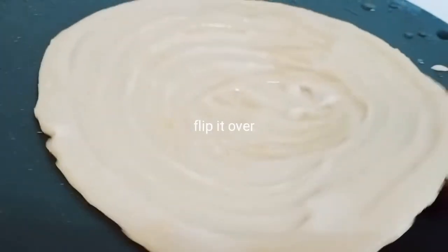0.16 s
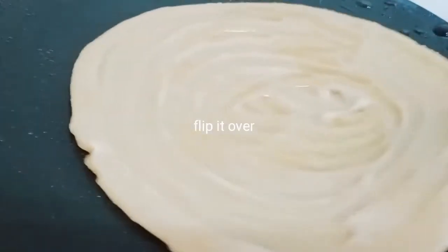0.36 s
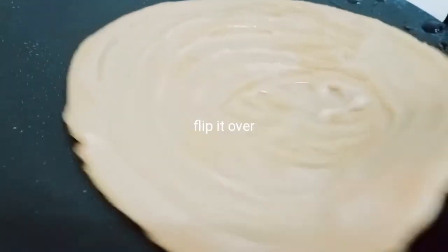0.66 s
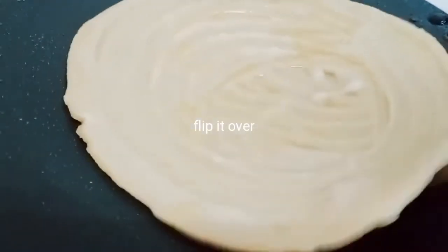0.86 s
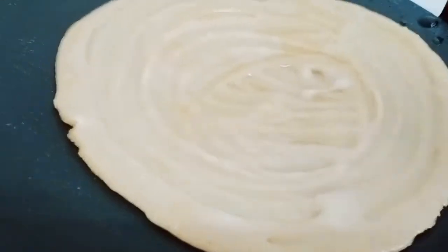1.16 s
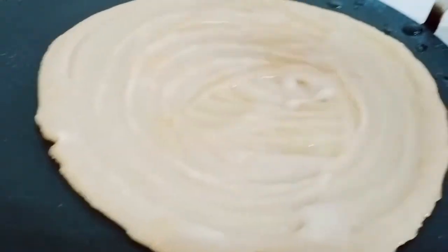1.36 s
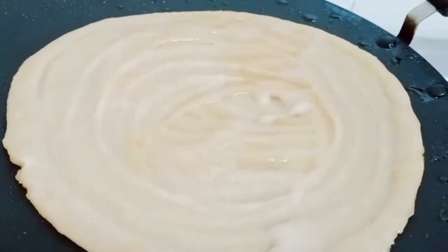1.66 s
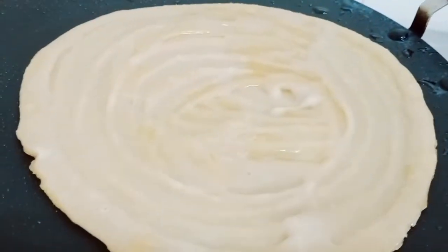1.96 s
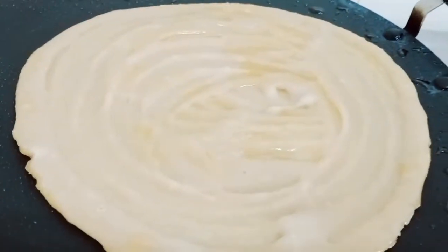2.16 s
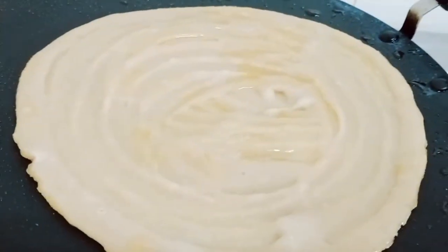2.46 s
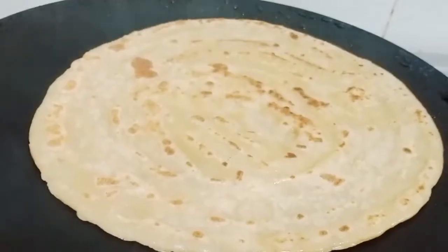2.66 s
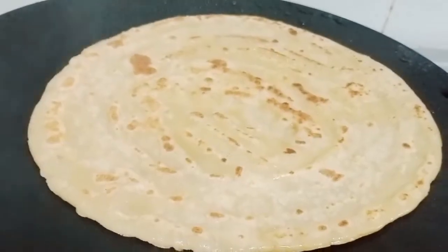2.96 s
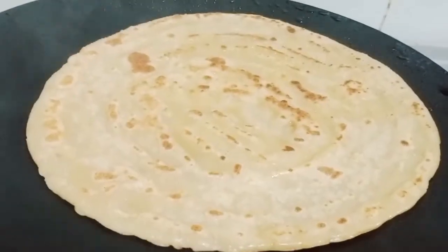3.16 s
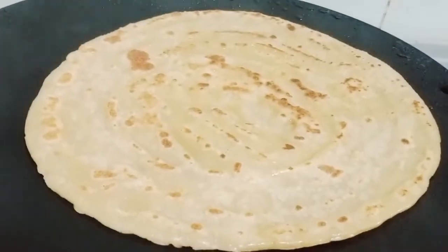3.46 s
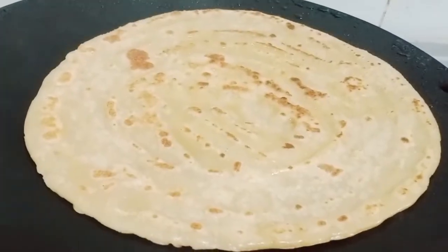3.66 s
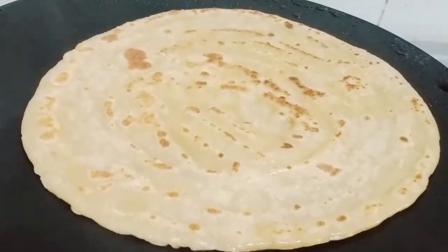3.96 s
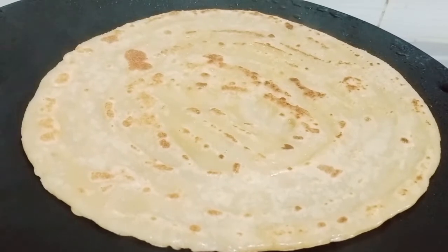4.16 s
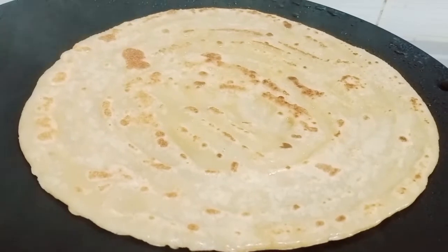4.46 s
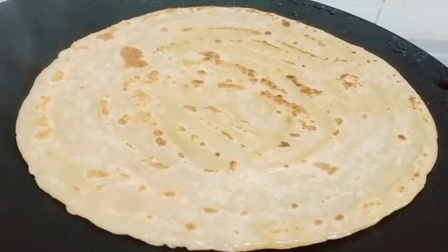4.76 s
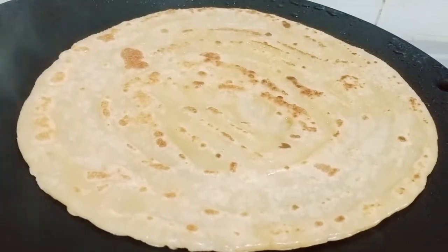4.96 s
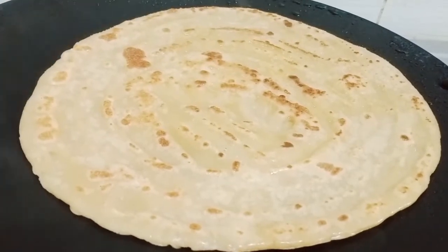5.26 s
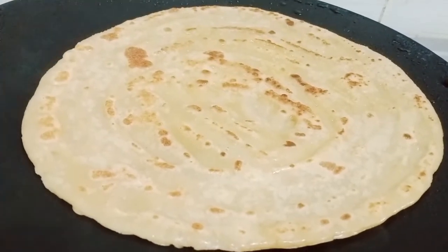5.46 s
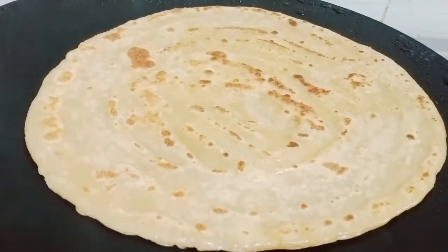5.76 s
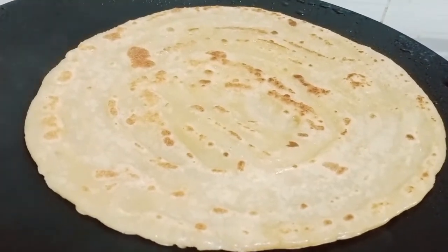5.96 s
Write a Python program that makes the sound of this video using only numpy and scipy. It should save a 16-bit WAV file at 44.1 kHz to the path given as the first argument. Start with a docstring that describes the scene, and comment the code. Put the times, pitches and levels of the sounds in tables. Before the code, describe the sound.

Close frying surges with sharp pops and ringing griddle clacks, fades, then switches to a smooth steady hiss and a thin, wavering high whistle.

```python
"""A flatbread fries in ghee on an iron griddle, close to a mono microphone in a small kitchen with an appliance hum.
First the fat sputters, fizzes and crackles in surges (random grains through colour filters), droplets pop
(resonated pulses) and a utensil knocks the griddle (clacks plus ringing modes); from about 1.9 s the frying sinks.
From three seconds on the browned bread hisses evenly (coloured noise with fine ticks), a few droplets still pop,
and steam whistles faintly from under it (a fluttering sine whose pitch sags and snaps back)."""
import sys
import numpy as np
from scipy import signal
from scipy.fft import rfft, irfft
from scipy.io import wavfile
from scipy.ndimage import uniform_filter1d

SR = 44100
rng = np.random.default_rng(int(sys.argv[2]) if len(sys.argv) > 2 else 0)


def waveform_to_disk(signal):
    """Save audio, clipped to [-1, 1], as 16-bit WAV at the path in sys.argv[1]."""
    frames = np.transpose(np.atleast_2d(signal))
    scaled = np.clip(frames, -1, 1) * 32767
    samples = np.round(scaled).astype(np.int16)
    wavfile.write(sys.argv[1], SR, samples)


N = 269847
T = np.arange(N) / SR
STEAM_START_S = 3.006  # frying stops, even hiss and whistle begin

# spectrum of crackle and fat ticks: (frequency [Hz], level [dB])
CRACKLE_SPECTRUM = [(300, -39), (1500, -26.5), (3500, -2.5), (5200, -6), (7200, -1), (9000, 1),
                    (12000, -4.5), (15500, 2)]


def amp(db):
    """Decibels to gain."""
    return 10 ** (np.asarray(db) / 20)


def unit(x):
    """Scale to rms 1."""
    return x / np.sqrt(np.mean(x ** 2))


def curves(table):
    """Each column of a table, interpolated over its time column to a value per sample."""
    s, *columns = np.transpose(table)
    return [np.interp(T, s, column) for column in columns]


def walk(rate):
    """Smooth random curve, rms 1, with about `rate` turns a second."""
    hold = max(int(SR / rate), 2)
    steps = np.repeat(rng.standard_normal(N // hold + 1), hold)
    return unit(uniform_filter1d(steps, hold)[:N])


def resonate(x, hz, width_hz):
    """One resonance with gain 1 at its centre."""
    b, a = signal.iirpeak(hz, hz / width_hz, fs=SR)
    return signal.lfilter(b, a, x)


def colour(x, points, size=4096):
    """Minimum-phase filter through (Hz, dB) points, so clicks keep their sharp front."""
    hz, db = np.transpose(points)
    bins_hz = np.arange(size // 2 + 1) * SR / size
    gain_db = np.interp(np.log(bins_hz + 1), np.log(hz), db)
    # fold the cepstrum to make the filter causal
    cepstrum = irfft(np.log(amp(gain_db)))
    cepstrum[1:size // 2] *= 2
    cepstrum[size // 2 + 1:] = 0
    impulse = irfft(np.exp(rfft(cepstrum)))
    return signal.fftconvolve(x, impulse)[:N]


def fade(t, t60):
    """Exponential decay, 60 dB down after t60 seconds."""
    return np.exp(-np.log(1000) * t / t60)


def add(track, s, sound):
    """Mix a short sound into a track at time s."""
    i = int(s * SR)
    track[i:i + len(sound)] += sound[:N - i]


def bursts(per_second, spread_db, cap_db):
    """Tiny bubbles bursting at random: many small, a few large, rms 1."""
    happens = rng.random(N) < per_second / SR
    size_db = cap_db * np.tanh(spread_db * rng.exponential(size=N) / cap_db)
    return unit(happens * amp(size_db) * rng.choice([-1, 1], N))


def kitchen():
    """A motor hums with slightly unsteady tones over the low rush of the room."""
    # hum tones: (frequency [Hz], rms level [dB])
    hum_tones = [(118.4, -73.5), (177.6, -70.5), (196.3, -62), (294.3, -62.5), (314.4, -61), (2530, -71.5)]
    # room rush spectrum: (frequency [Hz], level [dB])
    rush_spectrum = [(25, -37), (36, -23), (49, 8.5), (62, -5.5), (100, 1.5), (175, 4), (250, -1.5),
                     (335, 1), (410, -4.5), (750, -6.5), (1150, -8.5), (1600, -6), (5000, -22),
                     (15000, -16)]
    hum = np.zeros(N)
    for hz, db in hum_tones:
        tone = np.sin(2 * np.pi * hz * T + 0.46 * walk(6.5))
        hum += amp(db) * unit(tone * amp(1.5 * walk(9.9)))
    rush = unit(colour(rng.standard_normal(N), rush_spectrum))
    return hum + amp(-54) * rush


def walls(x, t60, wet_db):
    """Short diffuse echo of the tiled kitchen: decaying noise after a 4 ms gap."""
    t = T[:SR // 2]
    tail = rng.standard_normal(len(t)) * fade(t, t60) * (t > .004)
    echo = signal.fftconvolve(x, tail / np.linalg.norm(tail))[:N]
    return x + amp(wet_db) * echo


def whistle():
    """A narrow steam jet sings and flutters; pitch sags as the soft opening yields, then snaps back up."""
    # jet: (time [s], mean pitch before flutter [Hz], level [dB])
    jet = [(3.01, 5750, -65), (3.38, 5360, -61), (3.52, 5820, -69), (3.61, 6090, -61), (3.76, 6000, -65),
           (3.95, 6320, -61), (4.17, 5820, -64), (4.35, 6200, -62), (4.45, 5520, -66), (4.55, 5330, -60),
           (4.7, 5550, -64.5), (5.1, 5580, -63), (5.27, 5790, -65), (5.44, 5570, -59.5), (5.68, 5290, -64),
           (5.88, 5600, -69), (5.97, 5980, -60), (6.11, 5670, -63)]
    snaps_per_s, sag_hz_per_s, sag_limit_hz = 12, 1700, 170.2
    hz, db = curves(jet)
    last_snap_s = np.maximum.accumulate(T * (rng.random(N) < snaps_per_s / SR))
    sag_hz = np.minimum(sag_hz_per_s * (T - last_snap_s), sag_limit_hz)
    flutter = 1 + .005 * walk(60) + .009 * walk(900)
    pitch_hz = (hz + sag_hz.mean() - sag_hz) * flutter
    tone = np.sin(2 * np.pi * np.cumsum(pitch_hz) / SR)
    waver = amp(2.2 * walk(90) + 1.5 * walk(14))
    return unit(tone * waver) * amp(db) * (T >= STEAM_START_S)


def steam():
    """Steam seeps from under the browned bread: a smooth hiss with fine ticks of fat."""
    # hiss spectrum: (frequency [Hz], level [dB])
    hiss_spectrum = [(300, -6.5), (1100, -21), (2100, -2), (2600, 3), (3450, 7), (4100, -2), (4850, -13.5),
                     (5600, -6), (6800, -10), (8200, -3), (9500, -4.5), (11500, -5), (13800, 5),
                     (15500, 2.5)]
    hiss_db, ticks_db = -47, -58.5
    hiss = unit(colour(rng.standard_normal(N), hiss_spectrum)) * amp(0.39 * walk(18))
    ticks = unit(colour(bursts(per_second=910, spread_db=4.5, cap_db=30), CRACKLE_SPECTRUM))
    return (hiss * amp(hiss_db) + ticks * amp(ticks_db)) * (T >= STEAM_START_S)


def iron_ring():
    """Griddle ring after one blow: decaying sine modes, neighbours swinging opposite ways."""
    # griddle modes: (frequency [Hz], level [dB], t60 [s])
    modes = [(184.7, 4.5, 0.11), (274.7, -1, 0.52), (323, 2.5, 0.24), (372.4, 3.5, 0.3), (417, -1.5, 0.22),
             (654, 3.5, 0.41), (718, 5.5, 0.17), (1204, 1, 0.16), (1520, -16, .25), (1590, -21, .22),
             (1820, -26, 0.21), (2240, 1, 0.27), (2380, -12, 0.2), (2560, -2, 0.11), (3160, -11, .2),
             (3520, -13, 0.29)]
    t = T[:SR // 2]
    ring = np.zeros(len(t))
    for k, (hz, db, t60) in enumerate(modes):
        ring += (-1) ** k * amp(db) * np.sin(2 * np.pi * hz * t) * fade(t, t60)
    return ring


def knocks():
    """Each knock of the utensil is one or more short clacks of different pitch over ringing iron."""
    # clacks: (time [s], clack peak [dB], clack pitch [Hz], ring over clack before a 28 dB cut [dB])
    clacks = [(0.498, -29.5, 1470, 2.5), (0.6915, -23, 755, 5), (0.692, -21, 2470, -19),
              (1.0901, -23.5, 407, -12), (1.093, -24.5, 1990, 6), (1.276, -13.5, 2640, -12),
              (1.28, -25, 2740, -21), (1.288, -29, 750, 10.5), (1.294, -25.5, 3560, -13),
              (1.303, -21.5, 3700, -24), (1.4352, -15, 3540, -23), (2.1, -36, 1085, 3)]
    out, t, ring = np.zeros(N), T[:SR // 2], iron_ring()
    grits = rng.standard_normal((len(clacks), len(t)))
    for (s, db, hz, ring_db), grit in zip(clacks, grits):
        push = grit * (0.14 * fade(t, t60=0.009) + 0.023 * fade(t, t60=0.2))
        push[0] = -1
        clack = resonate(resonate(push, hz, width_hz=1200), hz, width_hz=1700)
        clack = clack / np.abs(clack).max()
        add(out, s, amp(db) * (clack + amp(ring_db - 28) * ring))
    return out


def spits(crackle_db):
    """More droplets at random moments, stronger when the fat fries hard: rows as pops() takes them."""
    spits_per_s, over_crackle_db, spread_db, body_re_snap_db = 16, 19.5, 3.5, -9.5
    chance = rng.random((400, 3))[:int(spits_per_s * STEAM_START_S)]
    s = chance[:, 0] * STEAM_START_S
    size_db, body_db = spread_db * (2 * chance[:, 1:].T - 1)
    snap_db = np.interp(s, T, crackle_db) + over_crackle_db + size_db
    return list(zip(s, snap_db, body_re_snap_db + body_db))


def pops(droplets):
    """A droplet snaps with one sharp pulse, then spatters; its body is a dull thud and a short hollow ring."""
    snaps, bodies = np.zeros(N), np.zeros(N)
    t = T[:SR // 20]
    sprays = rng.standard_normal((500, len(t)))
    for (s, db, body_db), spray in zip(droplets, sprays):
        pulse = spray * (0.039 * fade(t, t60=0.0052) + 0.019 * fade(t, t60=0.082))
        pulse[0] = -1
        add(snaps, s, amp(db) * pulse)
        add(bodies, s, amp(db + body_db) * pulse)
    thud = amp(13) * resonate(bodies, hz=910, width_hz=4100)
    hollow = amp(11.5) * resonate(bodies, hz=3520, width_hz=370)
    return amp(4.0) * resonate(snaps, hz=11100, width_hz=8100) + thud + hollow


def frying_levels():
    """Levels of sputter, fizz and crackle [dB]: a simmer that sinks as the batter sets, reshaped by each surge."""
    # surges: (start [s], hold [s], crackle change [dB], fizz change [dB], sputter change [dB])
    surges = [(0.038, 0.051, 7.5, 5.5, 2), (0.175, 0.044, 10.5, 0, 2.5), (0.257, 0.06, 9, 5, -1.5),
              (0.363, 0.053, 5.5, 3, -2), (0.545, 0.045, 10, 7.5, 4), (0.753, 0.028, 4.5, 8.5, 7.5),
              (0.911, 0.069, 8, 6, 3.5), (1.161, 0.041, 6.5, 8, 3.5), (1.256, 0.062, 6, -2, -5.5),
              (1.378, 0.04, 6, 4, -5), (1.526, 0.21, 5.5, 4, 4)]
    attack_s, release_s, batter_sets_s = 0.029, 0.04, 1.885
    set_s = np.maximum(T - batter_sets_s, 0)
    # simmer level [dB], fall once set [dB/s]; the sputter also wanes 4 dB/s from the start
    sputter_db = -46 - 4 * T - 8.5 * set_s
    fizz_db = -46.5 - 10.5 * set_s
    crackle_db = -45.5 - 14.5 * set_s
    for s, hold_s, crackle_change, fizz_change, sputter_change in surges:
        attack = np.clip((T - s) / attack_s, 0, 1)
        surge = attack * np.exp(-np.maximum(T - s - attack_s - hold_s, 0) / release_s)
        sputter_db = sputter_db + sputter_change * surge
        fizz_db = fizz_db + fizz_change * surge
        crackle_db = crackle_db + crackle_change * surge
    return sputter_db, fizz_db, crackle_db


def sputter():
    """Coarse bubbling: the wet batter first gargles in a narrow band, which broadens as it sets."""
    # broad sputter spectrum: (frequency [Hz], level [dB])
    broad_spectrum = [(120, -8.5), (450, 0), (560, -2.5), (770, 5.5), (1050, -2.5), (1500, -1.5),
                      (2250, 0.5), (3200, -8.5), (8000, -28)]
    grains = bursts(per_second=2700, spread_db=3.5, cap_db=24)
    gargle = resonate(resonate(grains, hz=1540, width_hz=1600), hz=1530, width_hz=2200)
    wet = np.interp(T, [.35, 1.15], [.85, .08]).clip(0, 1)
    broad = colour(bursts(per_second=3000, spread_db=3.0, cap_db=25), broad_spectrum)
    return np.sqrt(wet) * unit(gargle) + np.sqrt(1 - wet) * unit(broad)


def brighten(x):
    """Smaller bubbles snap higher: the top rises steadily while the batter dries."""
    corner_hz, rise_db_per_s, neutral_s = 11000, 4.5, 1.2
    top = signal.sosfiltfilt(signal.butter(3, corner_hz, "high", fs=SR, output="sos"), x)
    top_db = rise_db_per_s * (np.minimum(T, STEAM_START_S) - neutral_s)
    return x + top * (amp(top_db) - 1)


def frying(sputter_db, fizz_db, crackle_db):
    """Water boils out through the fat: coarse sputter, plus dense wet fizz and sharper crackle in flurries."""
    # fizz spectrum: (frequency [Hz], level [dB])
    fizz_spectrum = [(300, -16), (1700, -15.5), (2350, 3), (2900, 3.5), (3550, 6.5), (4200, 4.5),
                     (5000, -3.5), (7000, -7.5), (11500, -3.5), (15500, -0.5)]
    # hard frying bursts more bubbles as well as louder ones
    busy = amp(.5 * np.maximum(crackle_db - crackle_db.max(), -23))
    flurries = amp(4 * np.tanh(walk(400))) / np.sqrt(busy)
    bubbles = bursts(per_second=6000 * busy, spread_db=2.5, cap_db=12)
    fizz = unit(colour(bubbles * flurries, fizz_spectrum))
    grains = bursts(per_second=3800 * busy, spread_db=6.5, cap_db=22)
    crackle = brighten(unit(colour(grains * flurries, CRACKLE_SPECTRUM)))
    sizzle = sputter() * amp(sputter_db) + fizz * amp(fizz_db) + crackle * amp(crackle_db)
    return sizzle * (T < STEAM_START_S)


def scene():
    """Everything on the griddle in its room, the same in both channels."""
    # droplets that stand out from the frying around them: (time [s], snap level [dB], body level re snap [dB])
    clear_droplets = [(0.1398, -8, -26), (0.1992, -15, -4.5), (0.248, -9.5, -27), (0.2737, -7.5, -18),
                      (0.298, -5.5, -26), (0.4498, -11, -21), (0.5682, -17, -11), (0.7798, -11.5, -5),
                      (0.9108, -11, -12), (1.3391, -12, -6), (1.3474, -13, -6.5), (1.372, -14, -7),
                      (1.391, -7.5, -7), (1.4365, -11.5, -24), (1.464, -20, -9), (1.6949, -16.5, -8),
                      (1.8278, -18, -12), (1.8964, -13, -16), (1.9195, -10, -20), (2.008, -13, -17),
                      (2.0485, -17.5, -18), (2.0773, -18.5, -8), (2.1126, -19.5, -10),
                      (2.1963, -21.5, -9.5), (2.3271, -19, -9), (2.3895, -23.5, -11),
                      (2.4234, -17.5, -13.5), (2.558, -26, -7), (2.6199, -31, 0), (2.6812, -8, -10.5),
                      (2.801, -17, -8), (2.8114, -17, -27), (2.859, -22, -25), (2.8771, -19, -17),
                      (2.9635, -24, -8), (3.689, -24, -15), (4.3242, -20, -17), (4.3328, -20, -13)]
    sputter_db, fizz_db, crackle_db = frying_levels()
    fat = frying(sputter_db, fizz_db, crackle_db) + pops(clear_droplets + spits(crackle_db))
    # the bursting bubbles also shake the iron faintly
    iron = knocks() + amp(-70.5) * signal.fftconvolve(fat, iron_ring())[:N]
    sizzle = walls(fat + steam(), t60=0.45, wet_db=-10.5)
    return np.tile(sizzle + iron + whistle() + kitchen(), (2, 1))


def record(dry):
    """The microphone port rings near 9 kHz; the top is cut steeply."""
    top_hz = 15600
    bright = dry + amp(12) * resonate(dry, hz=8880, width_hz=1260)
    return signal.sosfilt(signal.ellip(10, .2, 70, top_hz, fs=SR, output="sos"), bright)


dry = scene()
out = record(dry)
waveform_to_disk(out)
```